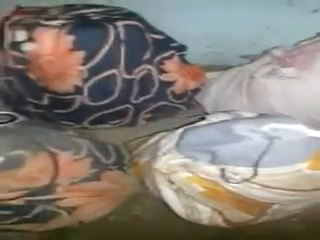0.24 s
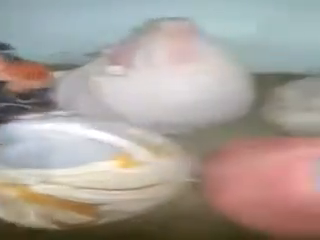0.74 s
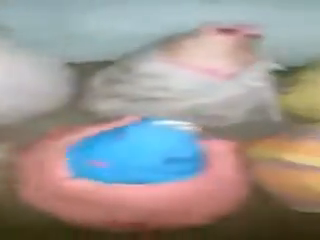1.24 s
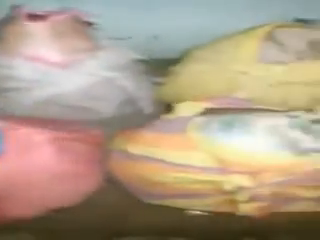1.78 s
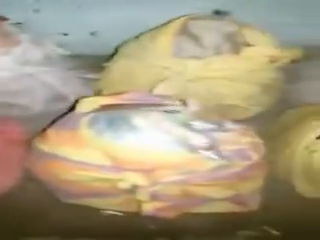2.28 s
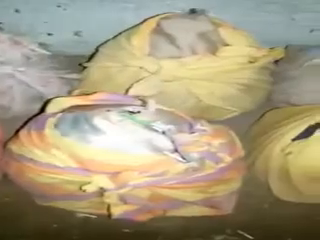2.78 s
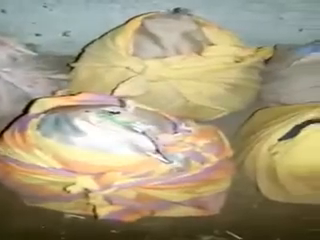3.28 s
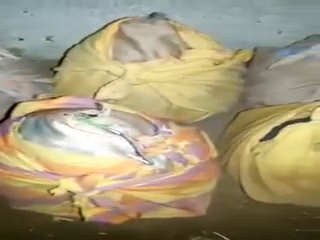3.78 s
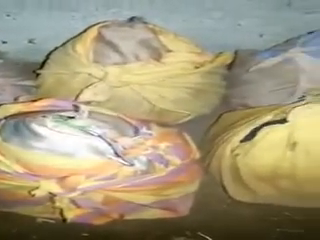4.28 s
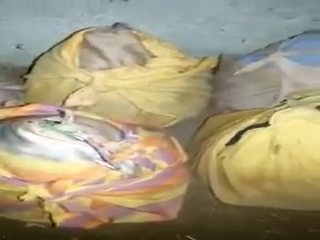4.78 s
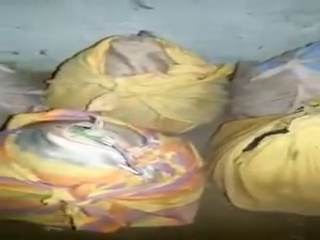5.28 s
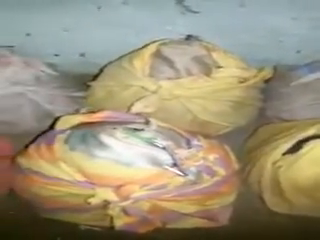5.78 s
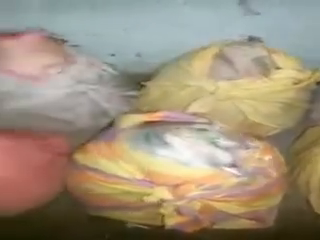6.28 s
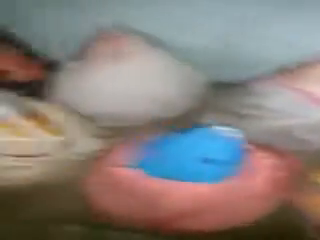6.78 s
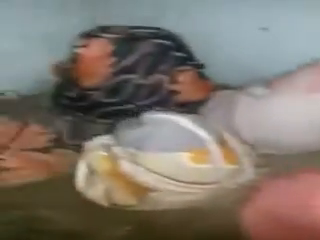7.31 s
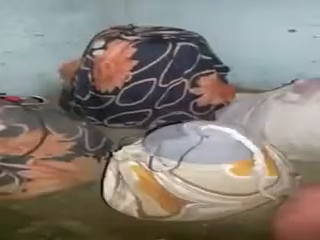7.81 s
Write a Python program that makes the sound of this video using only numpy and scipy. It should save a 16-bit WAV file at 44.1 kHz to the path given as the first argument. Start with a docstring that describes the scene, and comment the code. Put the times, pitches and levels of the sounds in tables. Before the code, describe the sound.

A bare, hard-walled room with a low, wavering hum and faint hiss. The tail of a hoarse quail growl is heard at once, ending by 0.25 s. Similar growls follow at about 0.8, 1.7, 2.7, 3.7 and 4.7 s, each a third of a second: a raspy, buzzing double tone that swells, rattles hard, then opens into a bright yelp. Between them are faint cage scuffs, notably around 0.6, 1.3 and 4.4 s, and thin gliding peeps near 2.5, 3.6 and 5.5 s. At 5.95 s the call changes to a loud, liquid whip snapping upward, then a pair at 6.2 and 6.3 s joined by a short purr. The pattern repeats weaker and further right at 6.9, 7.1 and 7.2 s, and begins again at 7.8 and 8.05 s. The hum sinks late; every whip leaves a short, bright wall echo.

```python
"""Quails calling in a bare room

Quails call from cloth-covered cages: six hoarse growls, then whip notes in the rhythm 'wet, wet-my-lips'.
A growl is two clashing tones that ring a moving beak resonance; a whip note is a leaping, nearly pure tone.
Soft purrs join two pairs of whip notes, and birds scuff (noise bursts) and peep (gliding tones) faintly.
Filtered noise gives a low hum and a hiss; echoes and decaying noise make the walls ring after every note."""
import sys
import numpy as np
from scipy import signal
from scipy.fft import rfft, irfft, next_fast_len
from scipy.io import wavfile
from scipy.ndimage import map_coordinates

SR = 44100
rng = np.random.default_rng(int(sys.argv[2]) if len(sys.argv) > 2 else 0)


def bounce(signal):
    """Save signal as a 16-bit WAV file at the path given by the first command-line argument."""
    frames = np.transpose(np.atleast_2d(signal))
    limited = np.clip(frames, -1, 1)
    pcm = np.round(limited * 32767).astype(np.int16)
    wavfile.write(sys.argv[1], SR, pcm)


N = 355005
TIME = np.arange(N) / SR

# Spectra of the noises, as relative levels: hz, level_db
HUM_SPECTRUM = [(15, -50.5), (25, -32.5), (37, -20.5), (161, 1.5), (279, -2.5), (318, -3), (442, -3.5),
                (483, -4), (835, -14), (1040, -25.5), (1290, -24), (2190, -18), (2550, -36.5),
                (3470, -23.5), (4720, -33.5), (6140, -59), (10400, -120)]
HISS_SPECTRUM = [(500, 7), (1200, -2.5), (3000, -4), (5400, -8.5), (6300, -35), (14000, -43.5)]
RUSTLE_SPECTRUM = [(500, -11), (1500, 1), (3500, 3.5), (5500, -1.5), (6600, -37), (10000, -53)]
BUMP_SPECTRUM = [(60, -22), (200, 9.5), (500, -3), (800, 9), (1300, -10), (4000, -44)]
RASP_SPECTRUM = [(300, -29), (900, 14), (2500, 7), (3600, 0), (5300, -21.5), (6800, -55)]
WALL_SPECTRUM = [(200, -3.5), (600, 0), (1100, -8.5), (2200, -3), (3600, 0.5), (4600, -12.5), (5700, 5.5),
                 (6600, -21), (8000, -30.5)]
# Colour that windpipe and covered cage give the hoarse voice: hz, gain_db
CAGE_COLOUR = [(480, 5.5), (600, 2.5), (760, -1), (1100, 2.5), (1480, -3), (1750, 1.5), (2150, 3),
               (2420, -6.5), (2650, 2), (2950, -1.5), (3200, -7), (3500, -2), (3900, -2.5), (4330, 3.5),
               (4580, -8), (4880, 3), (5700, -8.5), (6500, -22)]
# Treble loss of the left channel's direct sound: hz, gain_db
LEFT_SHADOW = [(1250, 0.5), (1700, -3.5), (2600, -9.5), (4500, -14.5)]
# Level of the hum before HUM_GAIN_DB: time_s, level_db
HUM_LEVEL = [(0.0, -45.5), (0.31, -43.5), (1.5, -54), (4.12, -50), (4.5, -54), (5.34, -42.5), (6.23, -62),
             (7.33, -67), (7.67, -62.5), (8.05, -65)]
# Narrow strands, relative to the hum before and after DROP_S: hz, early_db, late_db
HUM_STRANDS = [(175.5, -11.5, -29), (223.5, -13, -20.5), (270.3, -10.5, -3), (357.3, -16, -11),
               (429.6, -9.5, -14)]
# First echoes from cage and floor: left_delay_s, right_delay_s, level_db
NEAR_ECHOES = [(.0013, 0.0016, -18.5), (.0036, .0032, -13.5), (.0071, .0077, -15)]
# Faint gliding peeps: start_s, length_s, first_hz, last_hz, level_db, roughness (ratio)
PEEPS = [(0.656, 0.06, 3095, 4154, -45.5, 1), (2.413, 0.062, 2300, 1960, -53, 0.04),
         (2.471, 0.022, 1723, 1356, -52.5, 0.2), (2.498, .016, 2930, 3554, -41, 0.2),
         (3.622, 0.16, 3300, 4520, -39.5, 1.2), (5.514, 0.14, 2917, 4303, -45, 1.1),
         (5.806, .036, 3610, 2275, -47.5, 0.26)]
# Scuffs in the cages: start_s, rustle_db, bump_db, decay_s
SCUFFS = [(.5635, -42.5, -51.5, .009), (0.6306, -43, -42, .01), (1.268, -39, -37.5, 0.02),
          (1.335, -45, -37, 0.02), (1.36, -44, -46, 0.0062), (1.492, -41, -61.5, .007),
          (3.47, -47.5, -58, .012), (4.371, -43, -62, 0.0097), (5.42, -53, -49, .012)]
# The two sides of the syrinx: pitch (ratio), level_db
SYRINX_SIDES = [(1, -2.5), (1.14, -8)]
# Throat harmonics from the first upward: level_db
THROAT_HARMONICS = [-17, 0, -12, -10, -14.5, -17.5, -21, -23, -25.5, -29.5, -34]
# Purrs: start_s, end_s, level_db, left_minus_right_db
PURRS = [(6.206, 6.258, -5, -2), (7.152, 7.21, -8, -5.5)]
# Growls: start_s, length_s, attack_s, level_db, yelp_boost_db, pitch (ratio), resonance (ratio),
# left_minus_right_db
GROWLS = [(-.082, 0.33, .07, -5, 4.5, .955, .86, -5), (0.796, 0.34, 0.081, -3, 6.5, .965, .92, -4),
          (1.733, 0.34, 0.06, -0.5, 6.5, 0.97, 1.046, -1), (2.688, 0.33, 0.044, 0, 3.5, 0.99, 1.04, -.5),
          (3.663, .34, 0.044, .5, 6.5, 1.01, 1.045, -.5), (4.694, 0.34, 0.053, 0, 6.5, 0.96, 1.055, -0.5)]
# Whip notes: snap_s, level_db, snap_boost_db, length (ratio), left_minus_right_db
WHIPS = [(5.9455, 1.5, 1.5, 0.67, -2.5), (6.1793, 3, -4, 1.01, -1), (6.2798, -3.5, 2, 1.04, -5.5),
         (6.9115, -6.5, 2, 1, -6.5), (7.1268, -7.5, 2.5, 1.11, -6.5), (7.2258, -8.5, 5, 1.1, -8),
         (7.83, -9, 3, 0.99, -6), (8.043, -6.5, 3.5, 1.04, -10)]

# The hiss follows a share of the hum's swings and sinks over DROP_S, during the whip notes
HUM_GAIN_DB = 3
HISS_DB, HISS_FOLLOWS, HISS_DROP_DB = -58.5, 0.16, -10
DROP_S = (6.4, 7)

# In a purr the pitch rises while the beak closes (first, last)
PURR_PITCH_HZ, PURR_BEAK_HZ = (506.4, 642), (2500, 1052)
PURR_THROAT_DB, PURR_BEAK_DB, PURR_BEAK_FADE_DB, PURR_RATTLE = -29, -16, -11, 0.4

# A growl's pitch, before its ratio, climbs evenly to a crest (share of length), then droops ever faster
START_HZ, CREST_HZ, END_HZ, CREST_AT = 479, 594.3, 430.7, .56
THROAT_DB, BEAK_DB, CRESCENDO_DB = -20.5, -22.5, 7.5
DROOP_DB, GROWL_RELEASE_S = -5, 0.034
# The beak opens twice: (opens, widest, shut) as shares of the length
SWELL_SHARES, YELP_SHARES = (.16, .25, .5), (.685, .795, 1.06)
# Beak resonance when shut and the lift of each gape, before the resonance ratio
SHUT_HZ, SWELL_LIFT_HZ, YELP_LIFT_HZ = 1070, 1000, 1564
GAPE_CURVE = .75  # below 1 the beak lingers open
# Rattle depth (0-1): a light base and a bell-shaped swell (centre, spread as shares of the length)
RATTLE_LIGHT, RATTLE_SWELL, RATTLE_AT, RATTLE_SPREAD = 0.27, .58, .58, 0.13

# Whip times count from the snap and rates are per second, before each note's length ratio
CREEP_S, CREEP_HZ, KNEE_HZ = .025, 1180, 2321
LEAP_HZ, LEAP_LAG_S, LEAP_S = 1670, 0.00056, .0012
WHIP_DB, SWELL_DB_PER_S, GROW_S, GROW_DB_PER_S = -3, 2102, 0.0094, 751.5
COLLAPSE_DB_PER_S, COLLAPSE_S = 4296.5, 0.0056


def undb(db):
    """Logarithmic level: decibels become an amplitude factor."""
    return 10 ** (np.asarray(db) / 20)


def unit(x):
    """Normalisation: scale to rms 1."""
    return x / np.sqrt(np.mean(x ** 2))


def shade(x, colour):
    """Linear filtering: weight each frequency by a curve of (Hz, dB)."""
    hz, db = np.transpose(colour)
    size = next_fast_len(len(x))
    bins_hz = np.fft.rfftfreq(size, 1 / SR)
    gain = undb(np.interp(np.log(bins_hz + 1), np.log(hz), db))
    return irfft(rfft(x, size) * gain, size)[:len(x)]


def noise(colour, size):
    """Coloured noise: white noise shaped by a spectrum, at rms 1."""
    return unit(shade(rng.standard_normal(size), colour))


def wander(t, rate):
    """Random modulation: a smooth curve of spread near 1 through rate new values a second."""
    return map_coordinates(rng.standard_normal(1024), [(t - t[0]) * rate], order=2, mode="wrap")


def turn(hz):
    """Phase is accumulated frequency: radians of a moving pitch."""
    return 2 * np.pi * np.cumsum(hz) / SR


def ringing(t, phase, rate):
    """Randomly driven resonance: strength and phase renew rate times a second."""
    return wander(t, rate) * np.sin(phase) + wander(t, rate) * np.cos(phase)


def fade(t, attack_s, release_s):
    """Amplitude envelope: smooth attack, hold and release over the times t."""
    rise = np.clip((t - t[0]) / attack_s, 0, 1)
    fall = np.clip((t[-1] - t) / release_s, 0, 1)
    return (np.sin(np.pi / 2 * rise) * np.sin(np.pi / 2 * fall)) ** 2


def add(out, sound, start, pan_db):
    """Superposition: add a sound at its time, placed by the level difference left minus right."""
    index = int(start * SR) + np.arange(len(sound))
    inside = (index >= 0) & (index < N)
    gains = undb(np.array([[pan_db], [-pan_db]]) / 2)
    out[:, index[inside]] += gains * sound[inside]


def background(hum_side_db=-13, hiss_side_db=-6, waver_db=2.16, pan_db=-2.0):
    """Partly correlated noise: a hum with wavering strands, nearly alike on both sides, and a faint hiss."""
    time_s, level_db = np.transpose(HUM_LEVEL)
    sides = np.array([[1], [-1]])
    hum_db = np.interp(TIME, time_s, level_db) + HUM_GAIN_DB
    hiss_db = HISS_DB + HISS_FOLLOWS * (hum_db - hum_db.mean())
    hiss_db = hiss_db + np.interp(TIME, DROP_S, [0, HISS_DROP_DB])
    # a second noise of opposite sign on the two sides gives width
    hum = noise(HUM_SPECTRUM, N) + undb(hum_side_db) * sides * noise(HUM_SPECTRUM, N)
    hum = signal.sosfilt(signal.butter(2, 1100, fs=SR, output="sos"), hum) * undb(-1.5)
    for hz, *levels_db in HUM_STRANDS:
        strand_db = np.interp(TIME, DROP_S, levels_db)
        hum = hum + undb(strand_db) * ringing(TIME, 2 * np.pi * hz * TIME, 14)
    hiss = noise(HISS_SPECTRUM, N) + undb(hiss_side_db) * sides * noise(HISS_SPECTRUM, N)
    wavering_hum = undb(hum_db + waver_db * wander(TIME, 14)) * hum
    return (wavering_hum + undb(hiss_db) * hiss) * undb(sides * pan_db / 2)


def room(x, wet_db, early_db, early_s, t60, likeness, lean_db):
    """Reverberation: close echoes, a quick scatter from neighbouring cages, then the ring of bare walls."""
    t = TIME[:SR]
    onset = np.clip((t - .002) / 0.0057, 0, 1)
    shared = noise(WALL_SPECTRUM, SR)
    out = x.copy()
    for *delays, db in NEAR_ECHOES:
        for channel, delay in enumerate(delays):
            lag = int(delay * SR)
            out[channel, lag:] += undb(db) * x[channel, :-lag]
    source = x.mean(axis=0)
    for channel, side in enumerate((1, -1)):
        # likeness is the share of power common to both sides
        own = noise(WALL_SPECTRUM, SR)
        diffuse = onset * (np.sqrt(likeness) * shared + np.sqrt(1 - likeness) * own)
        ring = undb(wet_db) * unit(diffuse * undb(-60 * t / t60))
        scatter = undb(early_db) * unit(diffuse * np.exp(-t / early_s))
        response = (ring + scatter) / np.sqrt(SR)
        out[channel] += undb(side * lean_db / 2) * signal.fftconvolve(source, response)[:N]
    return out


def small_sounds(pan_db=-3):
    """Gliding tones and decaying contact noise: thin peeps and brief scuffs of the other birds."""
    out = np.zeros((2, N))
    for start, length, first_hz, last_hz, db, rough in PEEPS:
        t = np.arange(0, length, 1 / SR)
        hz = np.linspace(first_hz, last_hz, len(t)) * (1 + 0.076 * rough * wander(t, 290))
        add(out, undb(db) * np.sin(turn(hz)) * np.sin(np.pi * t / length), start, pan_db)
    t = TIME[:SR // 5]
    for start, rustle_db, bump_db, decay in SCUFFS:
        rustle = undb(rustle_db) * noise(RUSTLE_SPECTRUM, len(t))
        bump = undb(bump_db) * noise(BUMP_SPECTRUM, len(t))
        envelope = np.minimum(t / 0.00049, 1) * np.exp(-t / decay)
        add(out, (rustle + bump) * envelope, start, pan_db)
    return out


def hoarse_voice(t, hz, throat_db, beak_hz, beak_db, rattle, grit_db, rasp_db, rattle_hz=102,
                 swing=0.14, width=0.23, pipe_hz=1130, pipe_db=-14):
    """Source and filter: two clashing syrinx tones ring a moving beak resonance; a rattle chops and bends them."""
    jitter, drift, shimmer, stutter, chop = .012, .014, .22, .15, .65
    flap = turn(rattle_hz * (1 + .2 * wander(t, 110)))
    pulse = (1 + chop * rattle * np.cos(flap)) * (1 + stutter * wander(t, 170))
    throat, beak = 0, 0
    for ratio, side_db in SYRINX_SIDES:
        bend = swing * rattle * np.sin(flap)
        unsteadiness = jitter * wander(t, 600) + drift * wander(t, 90.08)
        phase = turn(ratio * hz * (1 + bend + unsteadiness))
        for k, db in enumerate(THROAT_HARMONICS, 1):
            tone = np.sqrt(2) * np.sin(k * phase + rng.uniform(0, 2 * np.pi))
            partial = undb(side_db) * tone * (1 + shimmer * wander(t, 380))
            # side_db counts twice here: the weaker side hardly sounds unless the beak lifts it
            throat = throat + undb(db + side_db) * partial
            detuning = (k * ratio * hz - beak_hz) / (width * beak_hz)
            beak = beak + partial / (1 + detuning ** 6)
    # the wider the beak opens, the more irregular the vibration that rings it
    beak = beak + undb(grit_db) * (beak_hz / 1500) ** 2 * ringing(t, turn(beak_hz), 800)
    # air pressure holds the strength of the vibration steady
    power = signal.fftconvolve(beak ** 2, np.hanning(201) / 100, mode="same")
    beak = beak / np.sqrt(.02 + power)
    # turbulence hisses in time with the second side and rings the windpipe's fixed resonance
    hiss = undb(rasp_db) * noise(RASP_SPECTRUM, len(t)) * (1 + 0.46 * np.cos(phase))
    rasp = hiss + undb(pipe_db) * ringing(t, 2 * np.pi * pipe_hz * t, 260)
    voiced = pulse * (undb(throat_db) * throat + undb(beak_db) * beak)
    return shade(voiced + undb(throat_db) * rasp, CAGE_COLOUR)


def purrs(attack_s=0.029, release_s=.02):
    """Falling resonance over a rising pitch: a short hoarse sound between paired whip notes."""
    out = np.zeros((2, N))
    for start, end, db, pan_db in PURRS:
        t = np.arange(start, end, 1 / SR)
        hz = np.linspace(*PURR_PITCH_HZ, len(t))
        beak_hz = np.linspace(*PURR_BEAK_HZ, len(t))
        beak_db = PURR_BEAK_DB + np.linspace(0, PURR_BEAK_FADE_DB, len(t))
        voice = hoarse_voice(t, hz, PURR_THROAT_DB, beak_hz, beak_db, PURR_RATTLE, grit_db=0, rasp_db=-12.5)
        add(out, undb(db) * fade(t, attack_s, release_s) * voice, start, pan_db)
    return out


def gape(u, shares):
    """Aperture of the resonator: how wide the beak stands (0-1) at the share u of a growl."""
    return np.interp(u, shares, [0, 1, 0]) ** GAPE_CURVE


def growls():
    """Moving formant: pitch arches once, the beak gapes twice with a hard rattle between, ending in a yelp."""
    out = np.zeros((2, N))
    for start, length, attack_s, db, yelp_db, pitch, opening, pan_db in GROWLS:
        t = np.arange(0, length, 1 / SR)
        u = t / length
        droop = np.maximum(u - CREST_AT, 0) / (1 - CREST_AT)
        climb_hz = np.interp(u, [0, CREST_AT], [START_HZ, CREST_HZ])
        hz = climb_hz - (CREST_HZ - END_HZ) * droop ** 2
        swell, yelp = gape(u, SWELL_SHARES), gape(u, YELP_SHARES)
        beak_hz = SHUT_HZ + SWELL_LIFT_HZ * swell + YELP_LIFT_HZ * yelp
        beak_db = BEAK_DB + CRESCENDO_DB * u + yelp_db * yelp ** 3
        rattle = RATTLE_LIGHT + RATTLE_SWELL * np.exp(-((u - RATTLE_AT) / RATTLE_SPREAD) ** 2)
        voice = hoarse_voice(t, hz * pitch, THROAT_DB, beak_hz * opening, beak_db, rattle,
                             grit_db=-11.5, rasp_db=-27.5)
        # a growl weakens as its pitch droops
        envelope = undb(db + DROOP_DB * droop ** 2) * fade(t, attack_s, GROWL_RELEASE_S)
        add(out, envelope * voice, start, pan_db)
    return out


def whips(octave_db=-28, release_s=0.0017):
    """Frequency sweep: a nearly pure tone creeps up to a knee, then leaps within milliseconds and collapses."""
    out = np.zeros((2, N))
    for snap_s, db, snap_db, length, pan_db in WHIPS:
        t = np.arange(-CREEP_S * length, COLLAPSE_S * length, 1 / SR)
        before, after = np.maximum(-t / length, 0), np.maximum(t / length, 0)
        leap = 1 / (1 + np.exp((LEAP_LAG_S - t / length) / LEAP_S))
        hz = KNEE_HZ - (KNEE_HZ - CREEP_HZ) * (before / CREEP_S) ** 2 + LEAP_HZ * leap
        # the level swells fast, then grows slowly up to the snap, and collapses after it
        shape_db = WHIP_DB - SWELL_DB_PER_S * np.maximum(before - GROW_S, 0)
        shape_db = shape_db - GROW_DB_PER_S * before - COLLAPSE_DB_PER_S * after
        snap = np.interp(hz, [2300, 3000], [0, 1])
        phase = turn(hz * (1 + 0.015 * wander(t, 500)))
        # the second harmonic is strongest in the quiet creep
        second_db = octave_db + np.interp(hz, [2050, 2400], [0, -12])
        second = undb(second_db) * np.sin(2 * phase + .5 * wander(t, 1300))
        envelope = undb(db + shape_db + snap_db * snap) * fade(t, release_s, release_s)
        add(out, envelope * (np.sin(phase) + second), snap_s + t[0], pan_db)
    return out


def scene():
    """Superposition: all birds in one reverberant room, over the hum and hiss."""
    left, right = growls() + purrs() + small_sounds()
    shadowed = np.array([shade(left, LEFT_SHADOW), right])
    soft = room(shadowed, wet_db=-13, early_db=-14.0, early_s=0.0047, t60=0.49, likeness=0.26, lean_db=-4.0)
    sharp = room(whips(), wet_db=-10.0, early_db=-16.0, early_s=0.0021, t60=0.49, likeness=0.2, lean_db=-4.0)
    return soft + sharp + background()


def record(dry):
    """Saturation and band limit: the loudest peaks overload the microphone; the top is cut at 15.1 kHz."""
    knee = 22  # high: only peaks near full scale are rounded
    rounded = dry / (1 + np.abs(dry) ** knee) ** (1 / knee)
    rounded = rounded * np.minimum(TIME / 0.00035, 1)  # brief fade-in
    return signal.sosfilt(signal.ellip(8, .2, 70, 15100, fs=SR, output="sos"), rounded)


dry = scene()
out = record(dry)
bounce(out)
```